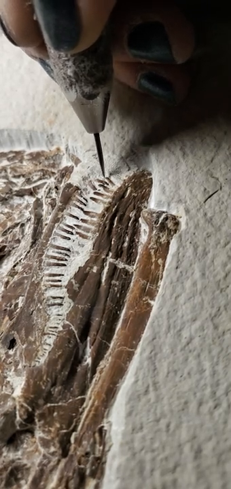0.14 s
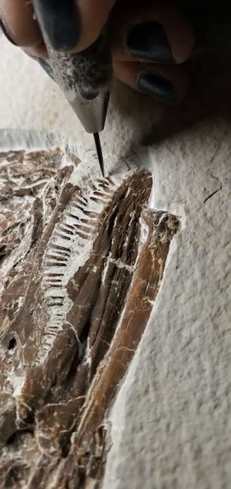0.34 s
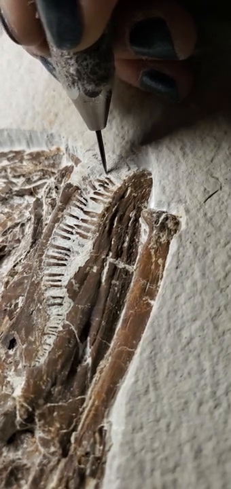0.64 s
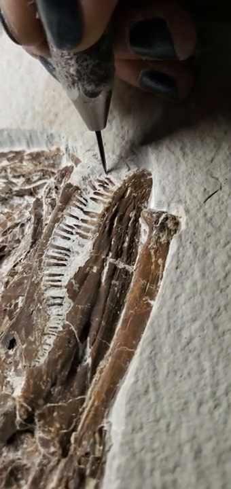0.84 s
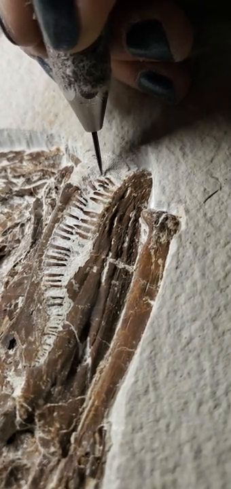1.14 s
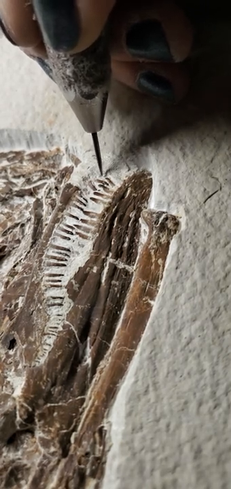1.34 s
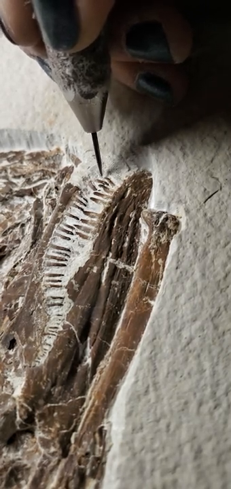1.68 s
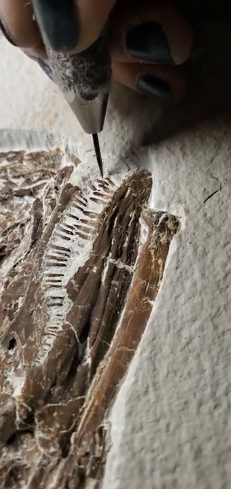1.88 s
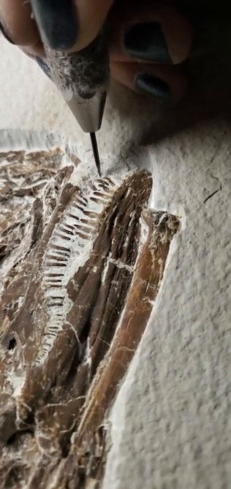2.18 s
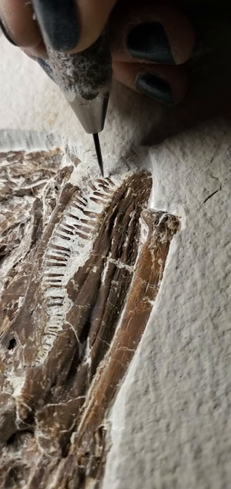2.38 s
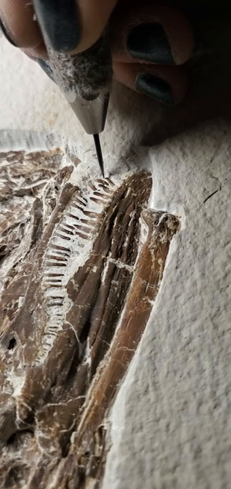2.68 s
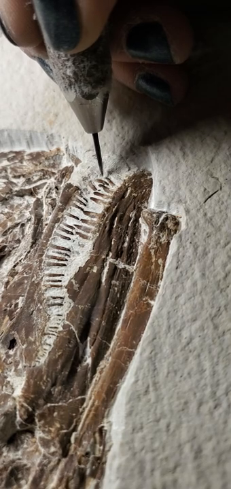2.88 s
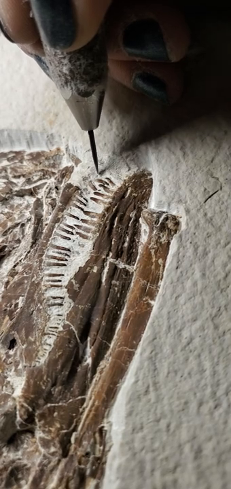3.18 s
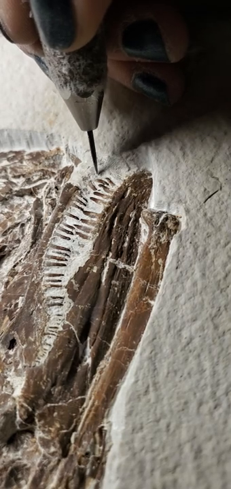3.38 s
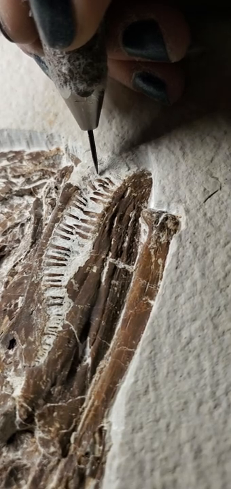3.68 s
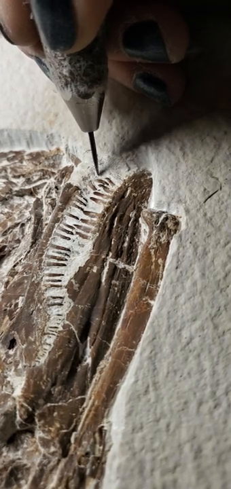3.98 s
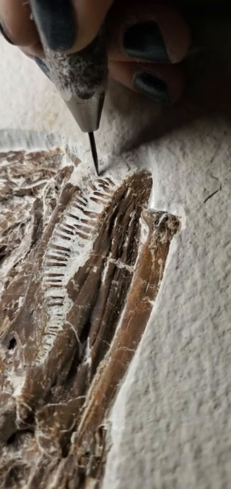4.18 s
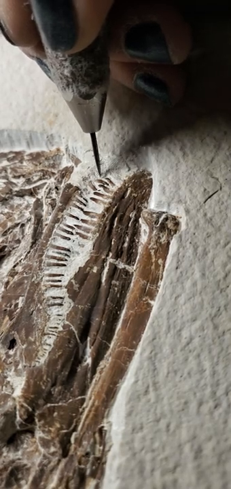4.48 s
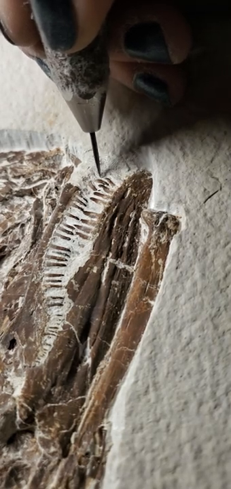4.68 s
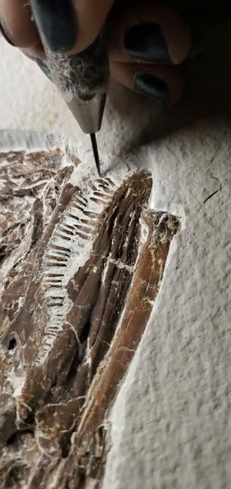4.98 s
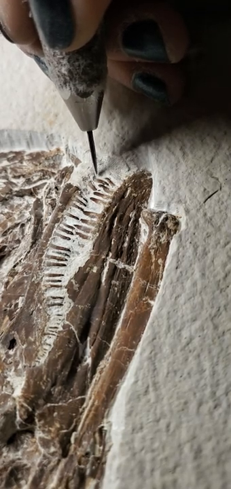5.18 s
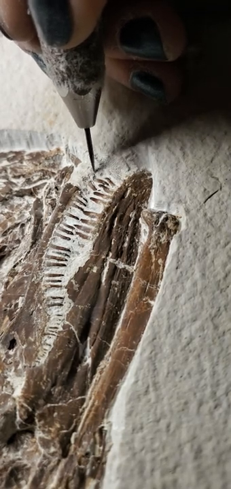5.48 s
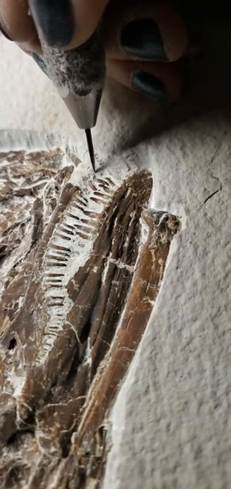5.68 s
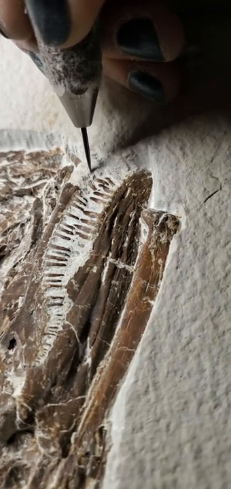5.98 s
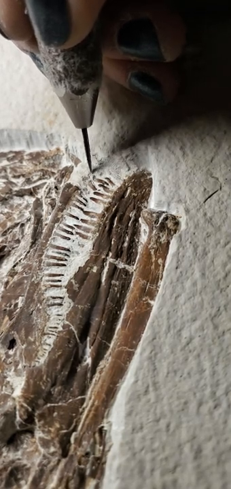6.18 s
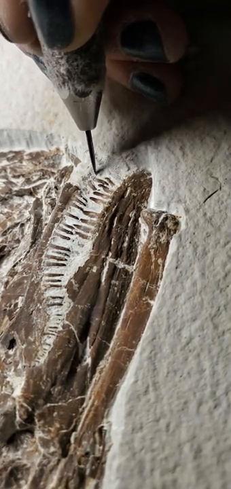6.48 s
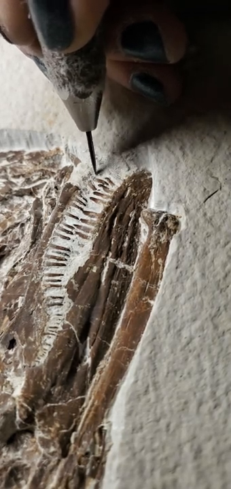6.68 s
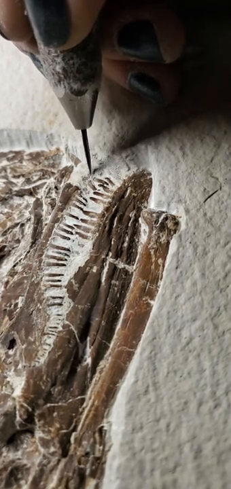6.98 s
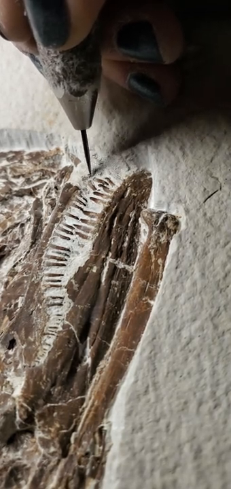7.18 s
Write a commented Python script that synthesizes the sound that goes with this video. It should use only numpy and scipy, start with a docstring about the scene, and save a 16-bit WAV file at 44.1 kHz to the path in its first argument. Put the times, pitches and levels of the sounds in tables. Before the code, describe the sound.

Close by in a workshop, a small air-driven chisel keeps up a steady metallic buzz and a thin hiss while its needle chips stone from a fossil. A run of quick, rattling touches comes first, then a short spell of lighter grazing, then a longer run of touches. The pitch rises a little on contact and sags when the needle lifts. A low hum lies underneath.

```python
"""Pneumatic scribe on a fossil

A piston releases one puff of air per stroke: a wavering buzz, with a hiss that pulses in step.
Each stroke excites the modes of the steel body by impact. About five times a second the needle
dabs the stone slab and rattles on it; the pitch rises on each dab and sags when the needle lifts.
A low machine hum fills the workshop."""
import sys
import numpy as np
from scipy import signal
from scipy.fft import rfft, irfft
from scipy.io import wavfile
from scipy.ndimage import uniform_filter1d

SR = 44100
rng = np.random.default_rng(int(sys.argv[2]) if len(sys.argv) > 2 else 0)


def wav_record(signal):
    """Record a signal, one row per channel, as 16-bit PCM in the file named by sys.argv[1]."""
    frames = np.transpose(np.atleast_2d(signal))
    bounded = np.clip(frames, -1, 1)
    # unit amplitude maps onto the largest positive 16-bit level
    quanta = np.round(bounded * 32767).astype(np.int16)
    wavfile.write(sys.argv[1], SR, quanta)


N = 323694
TIME = np.arange(N) / SR
FREQ = np.maximum(np.arange(N // 2 + 1) * SR / N, 1)


# needle dabs on the stone: mid t/s, duration/s, force level/dB, rise in stroke rate/Hz
DABS = [(0.141, 0.0546, 5.5, 12.01), (0.346, 0.05464, 5.5, 14), (0.552, 0.24, -0.5, 7.9),
        (0.816, 0.13, 7, 5.9), (1.031, 0.067, 5, 7.8), (1.218, 0.077, 3, 10.8), (1.61, 0.137, 5.5, 9.8),
        (1.851, 0.19, -3, 1.96), (3.155, 0.15, 5, 10.9), (3.384, 0.12, 2.5, 10.2), (3.594, 0.093, 1, 6.24),
        (3.82, 0.073, 6, 17), (4.002, 0.13, 4.6, 9.8), (4.203, 0.17, -3, 3.2), (4.41, 0.099, 6.5, 5.74),
        (4.611, 0.11, 6.5, 14), (4.786, 0.097, 3, 4.6), (5.028, 0.041, 5, 4), (5.195, 0.1, -4, 2),
        (5.501, 0.056, 3, 7.1), (5.693, 0.092, 4.5, 7), (5.888, 0.092, 7.5, 10), (6.089, 0.084, 7.5, 16),
        (6.291, 0.086, 7.5, 15), (6.487, 0.072, 4.5, 14.8), (6.689, 0.12, 4.5, 10), (6.889, 0.079, 2, 5.4)]

def piston(stroke_hz=366.5, sag_hz=13, spread=.031, settle_s=.11):
    """Frequency modulation: rebound from the stone quickens the piston. Returns its phase in strokes."""
    rebound_hz = sum(rise * touch(t, duration) for t, duration, _, rise in DABS)
    hz = stroke_hz + rebound_hz - sag_hz * lifted()
    jitter = walk(190)
    jitter -= uniform_filter1d(jitter, int(settle_s * SR))  # the air supply evens out slow drift
    return np.cumsum(hz * (1 + spread * jitter)) / SR


def pressure():
    """Contact force: the hand presses the needle on the stone, one swell per dab."""
    return sum(undb(db) * touch(t, duration) for t, duration, db, _ in DABS)


# needle lifts: mid t/s, duration/s
LIFTS = [(0.068, 0.035), (0.248, 0.039), (1.078, 0.0411), (1.286, 0.04086), (1.5, 0.072), (1.704, 0.052),
         (2.019, 0.031), (2.678, 0.1), (3.75, 0.05), (4.91, 0.039), (5.302, 0.071), (5.55, 0.051),
         (6.01, 0.04), (6.359, 0.049), (7.02, 0.053)]

def lifted():
    """Loss of contact: 0 on the stone, 1 clear of it."""
    return sum(touch(t, duration) for t, duration in LIFTS)


# partials of the puffs: harmonic number, left level/dB, right level/dB
PUFF_HARMONICS = [(1, -18, -19), (2, -34, -31.5), (3, -37, -38.5), (4, -36.5, -42.5)]
# dull rush of each puff: f/Hz, spectrum level/dB
RUSH_SPECTRUM = [(100, -77.5), (190, -63), (300, -60.5), (440, -54.5), (560, -62.5), (700, -60.5),
                 (880, -63.5), (1200, -72), (2000, -81), (4000, -101)]
# air cavities in the tool's nose: f/Hz, bandwidth/Hz, gain/dB
NOSE_CAVITIES = [(674, 41, 4.5), (1023, 59, 11), (1420, 59, 2.5)]

def puffs(strokes):
    """Siren principle: periodic puffs form a harmonic series, coloured by cavity resonance."""
    tone, mean_hz = 0, strokes[-1] * SR / N
    blunt_db = -.8 * pressure()  # pressing loads the piston and blunts the puffs
    for order, left, right in PUFF_HARMONICS:
        # the sharp tip of a puff varies more than its bulk, in size and in timing
        tip = order > 1
        flutter_db = blunt_db + .75 * walk(110) if tip else .13 * walk(90)
        slip = tip * .16 * walk(120)
        angle = 2 * np.pi * order * strokes + slip + stereo_phase(order * mean_hz)
        tone += undb([[left], [right]]) * unit(np.cos(angle) * undb(flutter_db))
    rush = radiate(lambda: pulsed_noise(strokes, at=0, depth_db=1), slope(RUSH_SPECTRUM), coherence=.95)
    boost_db = sum(db * abs(resonance(hz, width)) for hz, width, db in NOSE_CAVITIES)
    return irfft(rfft(tone + rush) * undb(boost_db), N)


# exhaust passage: f/Hz, bandwidth/Hz, left and right spectrum level/dB
PORT_MODES = [(6560, 720, -74.5, -76), (7570, 260, -72.5, -75), (8350, 490, -61, -96),
              (9500, 430, -64.5, -65.5), (10630, 610, -62, -65.5), (11850, 1800, -71.5, -69.5),
              (13470, 520, -61.5, -89), (14200, 500, -63, -68), (15400, 580, -65, -79)]
# envelope of the jet: t/s, relative level/dB
JET_ENVELOPE = [(0.0, 0.1), (2.3, 0), (3.1, -0.2), (7.34, -0.6)]
# hiss of the spent air: f/Hz, left and right spectrum level/dB
HISS_SPECTRUM = [(1500, -75, -75.5), (2980, -75.5, -75.5), (4100, -70.5, -75.5), (5660, -73, -91),
                 (7060, -71.5, -91), (8200, -83, -100), (9550, -78, -81), (11800, -79, -86),
                 (16000, -76, -82)]

def exhaust(strokes):
    """Jet noise: air spurts through a resonant port between pressure peaks and hisses as it spreads."""
    jet = radiate(lambda: pulsed_noise(strokes, at=.44, depth_db=3.4), modes(PORT_MODES), coherence=.85)
    jet *= undb(np.interp(TIME, *np.transpose(JET_ENVELOPE)))
    hiss = radiate(lambda: rng.standard_normal(N), slope(HISS_SPECTRUM), coherence=.23)
    hiss *= undb(1.37 * walk(45))
    return (jet + hiss) * undb(.47 * walk(140))


# steel body: f/Hz, bandwidth/Hz, left and right spectrum level/dB
BODY_MODES = [(1346, 91, -59, -66), (1620, 89, -70, -66), (1684, 93, -61, -65.5), (2106, 93, -64.5, -57.5),
              (2347, 120, -73, -64), (2757, 405, -66, -66), (3155, 380, -69, -69.5)]

def body(strokes):
    """Impact excitation: the piston knocks on the needle and rings the modes of the housing."""
    def knocks():
        noise = unit(pulsed_noise(strokes, at=0, depth_db=.5))
        return impacts(strokes, at=.939, scatter_db=1.5) + 1.46 * noise
    return radiate(knocks, modes(BODY_MODES), coherence=.9)


# stone slab: f/Hz, bandwidth/Hz, left and right spectrum level/dB
SLAB_MODES = [(934, 170, -67, -67.5), (1250, 130, -60.5, -65.5), (1572, 68, -63, -67.5),
              (1743, 89, -64, -66.5), (1983, 130, -76, -64), (2366, 102, -63.5, -57.5),
              (2870, 89, -80, -67.5), (3410, 450, -84, -75.5), (4190, 140, -80, -73),
              (5800, 1800, -86, -87)]

def needle(strokes, graze_db=-12.5, lift_db=-5):
    """Forced vibration: the slab rings with the contact force, hammered on dabs and grazed between."""
    graze = undb(graze_db + lift_db * lifted() + 2.9 * walk(22))
    force = np.hypot(pressure(), graze)

    def chips():
        noise = unit(pulsed_noise(strokes, at=.94, depth_db=6.5))
        return impacts(strokes, at=.799, scatter_db=3.5) + 1.27 * noise
    return 1.006 * force * radiate(chips, modes(SLAB_MODES), coherence=.71)


# machine hum: f/Hz, linewidth/Hz, relative level/dB
HUM_LINES = [(58.95, 2.6, 0.5), (112, 8.55, -10)]
# envelope of the hum: t/s, level/dB
HUM_ENVELOPE = [(0.0, -36.5), (2.2, -42), (4.5, -44), (6.1, -44), (7.34, -40.5)]
# workshop rumble: f/Hz, spectrum level/dB
RUMBLE_SPECTRUM = [(20, -81), (32, -91), (43, -63), (60, -60), (80, -66), (110, -57), (145, -79),
                   (300, -68.5), (1000, -102)]

def workshop():
    """Superposition: spectral lines of hum and a faint whine lie over a continuous rumble."""
    swell_db = np.interp(TIME, *np.transpose(HUM_ENVELOPE))
    hum = sum(drone(hz, width, db + swell_db) for hz, width, db in HUM_LINES)
    rumble = radiate(lambda: rng.standard_normal(N), slope(RUMBLE_SPECTRUM), coherence=.94)
    whine = drone(hz=475.3, width=4.993, db=-40)
    return (hum + whine + rumble) * undb([[.6], [-.6]])  # slightly to the left


def drone(hz, width, db):
    """Line broadening: a sinusoid wanders in frequency and level."""
    drift = np.cumsum(width / 2 * walk(14)) / SR
    return undb(db) * unit(np.sin(2 * np.pi * (hz * TIME + drift)) * undb(.9 * walk(10)))


# lead of the left channel over the right: f/Hz, phase/rad
PHASE_LEAD = [(60, -0.0), (367, 0.4), (734, 1.8), (1100, 2.4), (1850, 2.4), (2400, 4.7), (3000, 5.9),
              (6200, 10.7), (7400, 12.6), (9300, 19.5), (10200, 21.4), (13100, 25.0), (14000, 25.1),
              (15200, 28.6)]

def stereo_phase(hz):
    """Phase difference: sound arrives earlier on the left; each channel takes half the angle."""
    return np.interp(hz, *np.transpose(PHASE_LEAD)) * np.array([[.5], [-.5]])


def radiate(drive, gain, coherence):
    """Partial coherence: both channels share the direct sound; the scattered sound is independent."""
    direct = rfft(unit(drive())) * np.exp(1j * stereo_phase(FREQ))
    scattered = rfft([unit(drive()), unit(drive())])
    spectrum = np.sqrt(coherence) * direct + np.sqrt(1 - coherence) * scattered
    return irfft(spectrum * gain, N) * np.sqrt(SR / 2)


def pulsed_noise(strokes, at, depth_db):
    """Amplitude modulation: noise peaks at fraction `at` of each stroke."""
    return rng.standard_normal(N) * undb(depth_db * np.cos(2 * np.pi * (strokes - at)))


def impacts(strokes, at, scatter_db):
    """Impulse train: one click of random strength at fraction `at` of each stroke."""
    hits = np.flatnonzero(np.diff(np.floor(strokes - at)) > 0)
    clicks = np.zeros(N)
    clicks[hits] = undb(scatter_db * rng.standard_normal(len(hits)))
    return unit(clicks)


def modes(table):
    """Power summation of resonances: left and right gain per frequency."""
    return np.sqrt(sum(abs(undb([[left], [right]]) * resonance(hz, width)) ** 2
                       for hz, width, left, right in table))


def resonance(hz, width):
    """Two resonators in cascade: a band-pass with gain 1 at the centre."""
    detune = (FREQ / hz - hz / FREQ) * hz / width * np.sqrt(np.sqrt(2) - 1)
    return 1 / (1 + 1j * detune) ** 2


def slope(points):
    """Spectral envelope: gain interpolated over log frequency, one row per level column."""
    hz, *columns = np.transpose(points)
    return undb([np.interp(np.log(FREQ), np.log(hz), db) for db in columns])


def touch(t, duration):
    """Flat-topped window: one hand movement, from 0 to 1 and back."""
    return np.exp(-abs(2 * (TIME - t) / duration) ** 3)


def walk(rate):
    """Low-pass noise of rms 1, through `rate` random values a second."""
    knots = rng.standard_normal(int(N / SR * rate) + 2)
    return unit(np.interp(TIME * rate, np.arange(len(knots)), knots))


def undb(db):
    """Level to amplitude ratio."""
    return 10 ** (np.asarray(db) / 20)


def unit(x):
    """Normalisation to rms 1."""
    return x / np.sqrt(np.mean(x ** 2))


def scene():
    """Common excitation: one piston keeps tone, hiss, knocks and chipping in step, over the hum."""
    strokes = piston()
    return puffs(strokes) + exhaust(strokes) + body(strokes) + needle(strokes) + workshop()


def record(dry, cutoff_hz=15850):
    """Band limiting: a steep low-pass removes the highest treble."""
    return signal.sosfilt(signal.ellip(12, .1, 80, cutoff_hz, fs=SR, output="sos"), dry)


dry = scene()
out = record(dry)
wav_record(out)
```